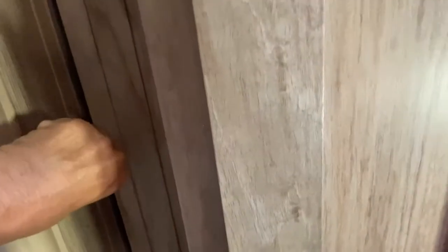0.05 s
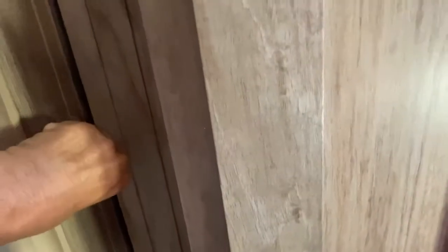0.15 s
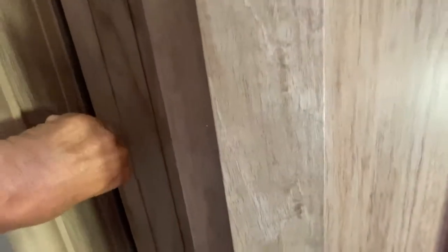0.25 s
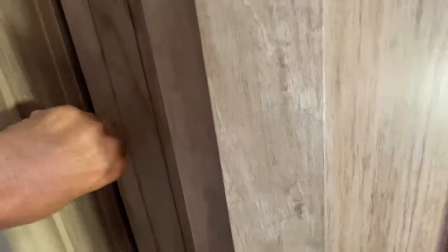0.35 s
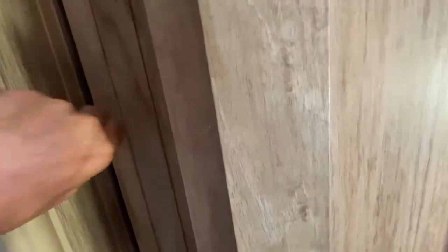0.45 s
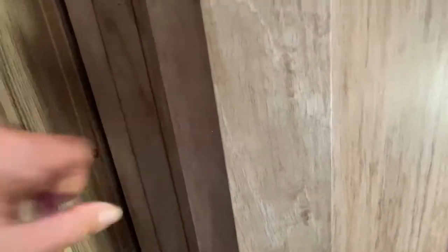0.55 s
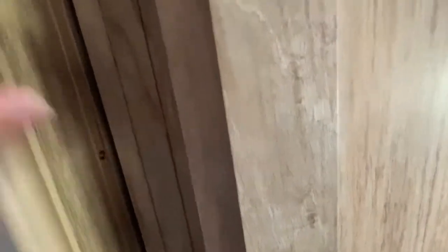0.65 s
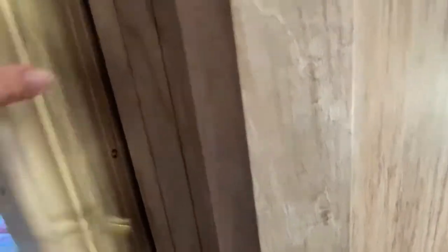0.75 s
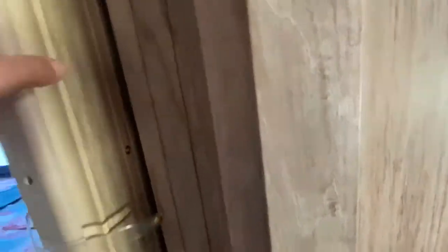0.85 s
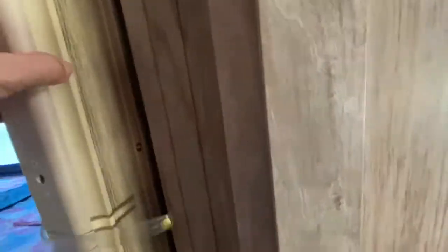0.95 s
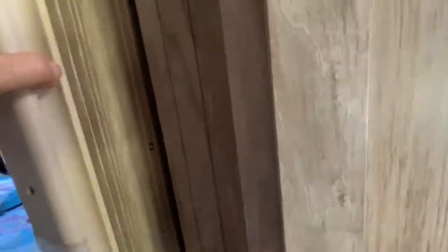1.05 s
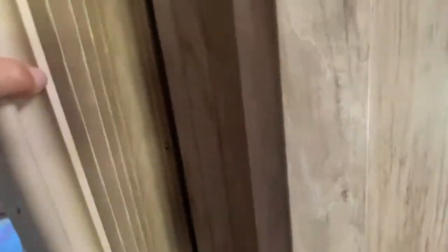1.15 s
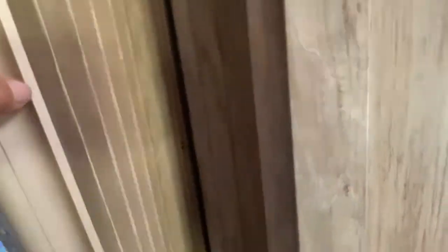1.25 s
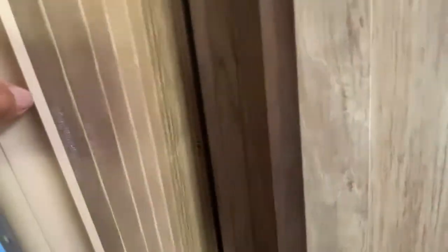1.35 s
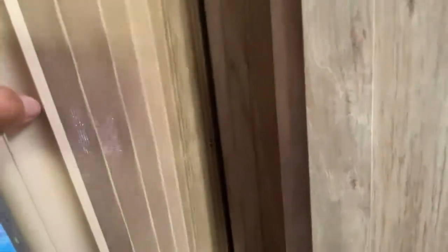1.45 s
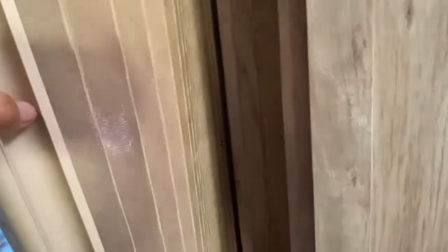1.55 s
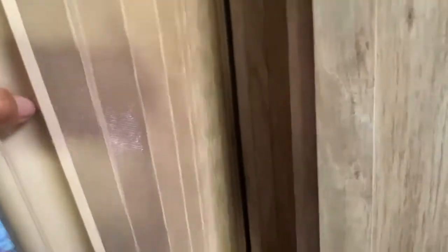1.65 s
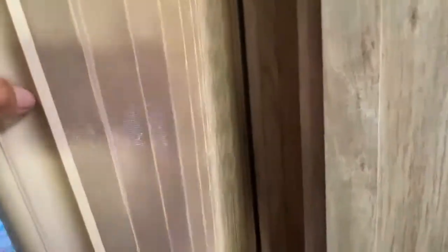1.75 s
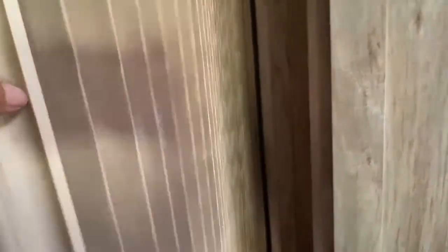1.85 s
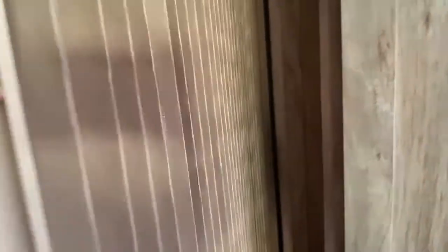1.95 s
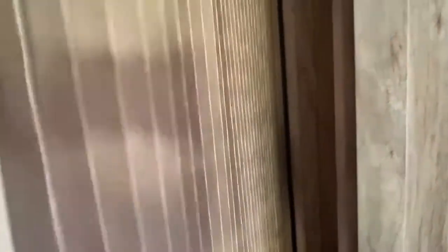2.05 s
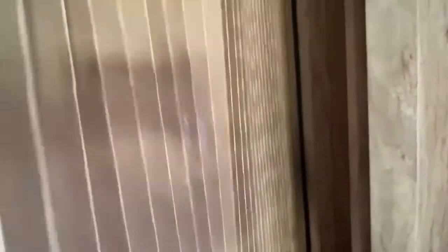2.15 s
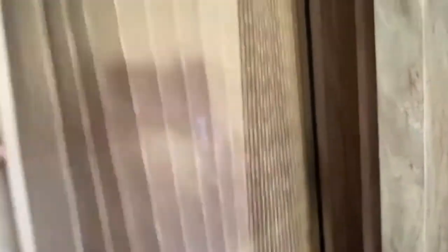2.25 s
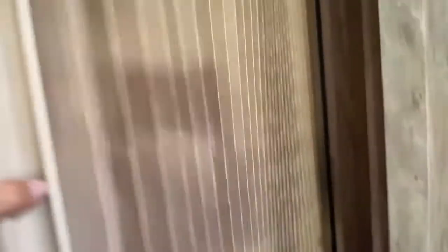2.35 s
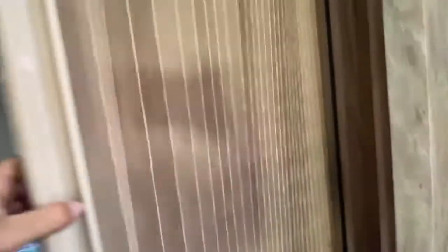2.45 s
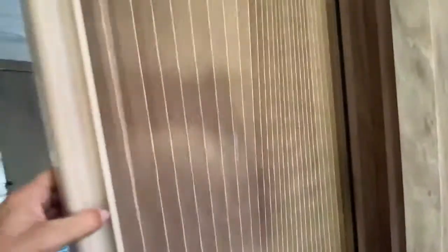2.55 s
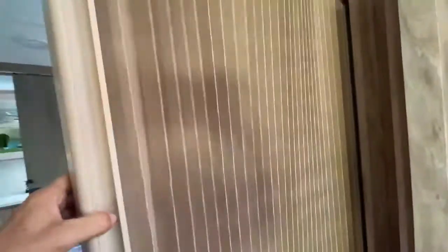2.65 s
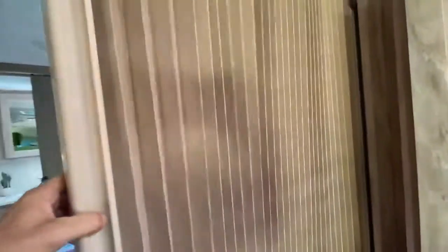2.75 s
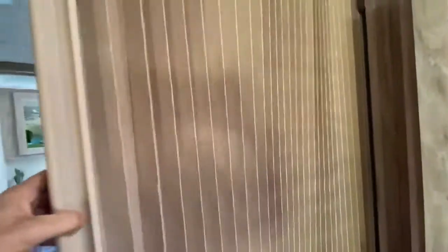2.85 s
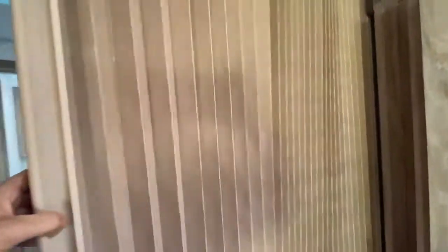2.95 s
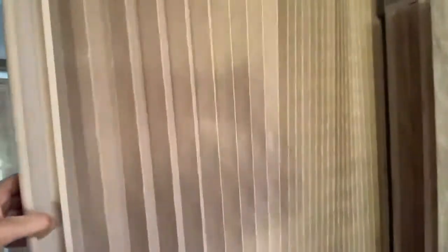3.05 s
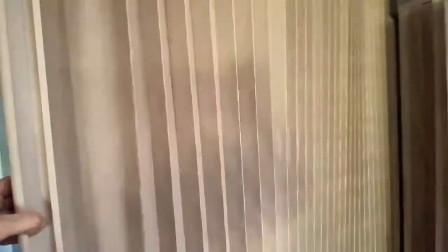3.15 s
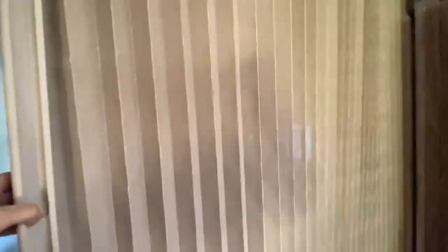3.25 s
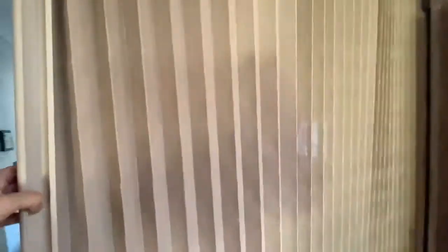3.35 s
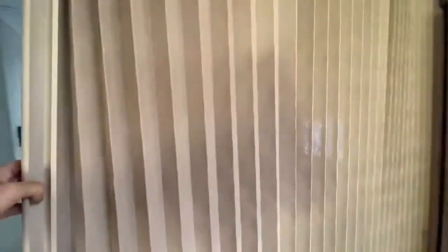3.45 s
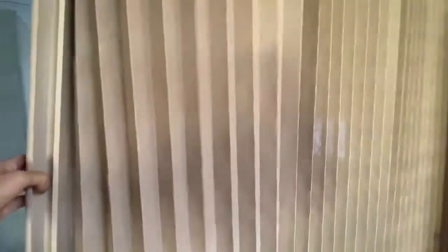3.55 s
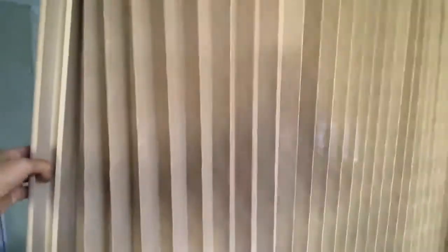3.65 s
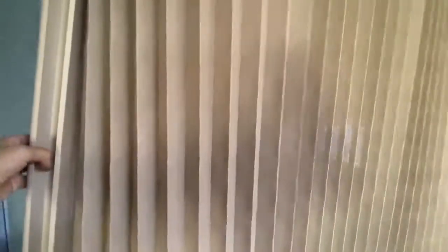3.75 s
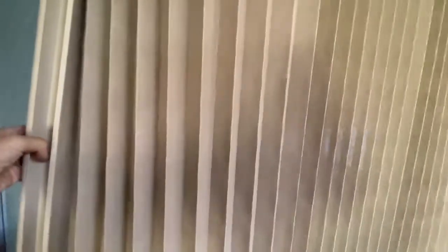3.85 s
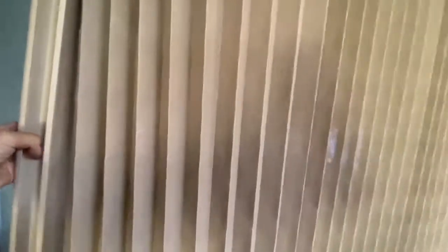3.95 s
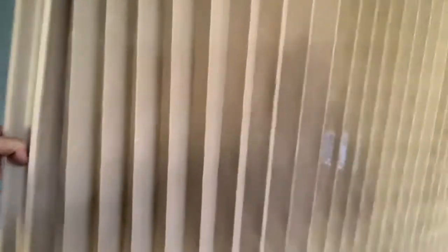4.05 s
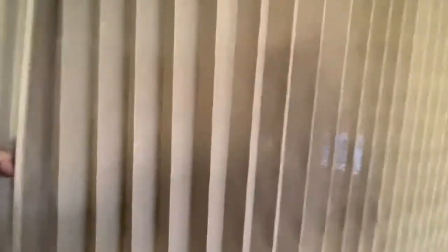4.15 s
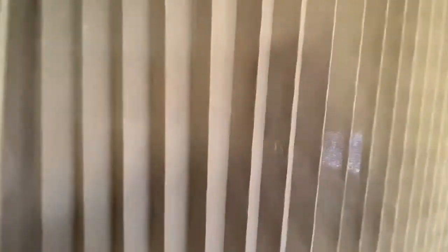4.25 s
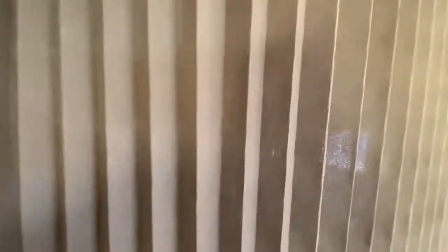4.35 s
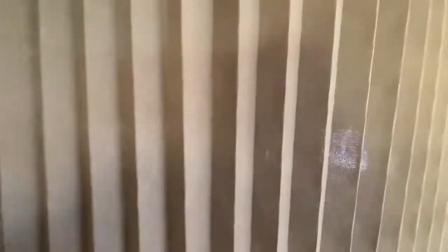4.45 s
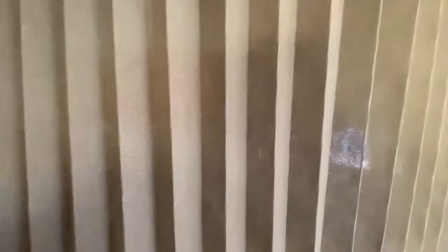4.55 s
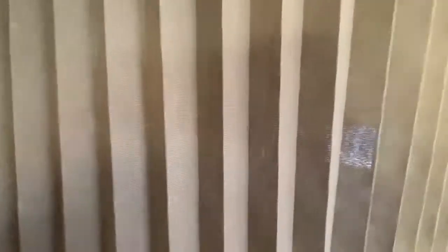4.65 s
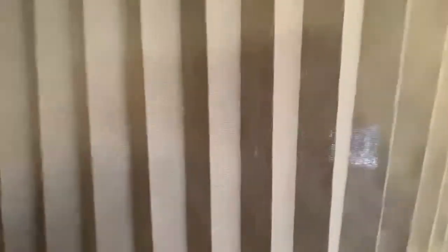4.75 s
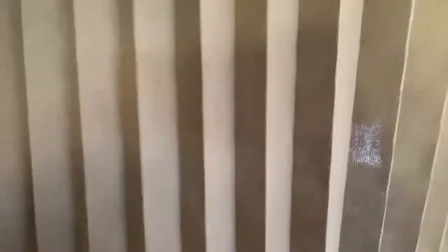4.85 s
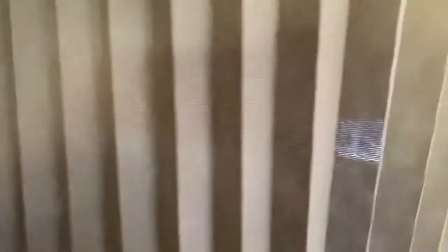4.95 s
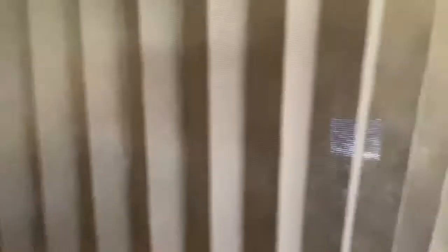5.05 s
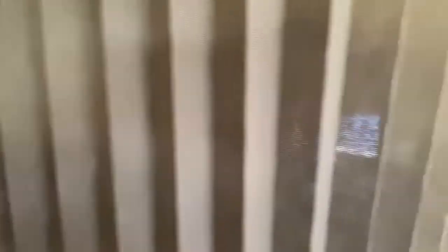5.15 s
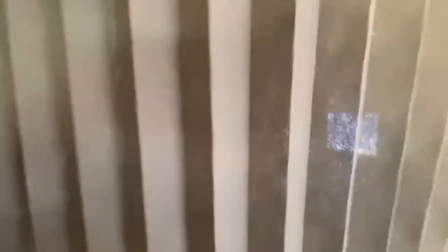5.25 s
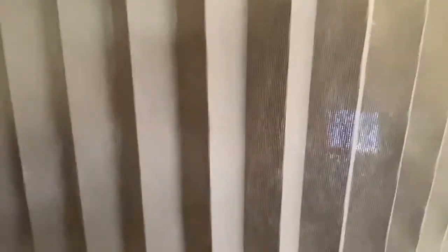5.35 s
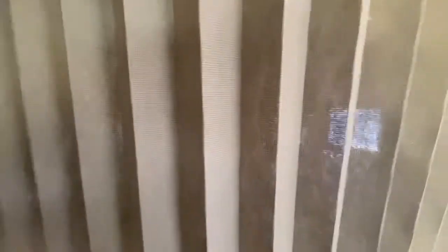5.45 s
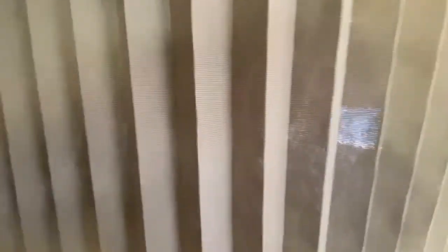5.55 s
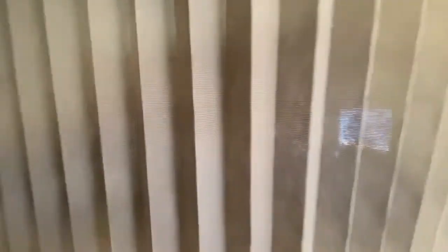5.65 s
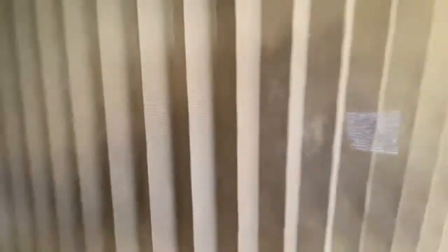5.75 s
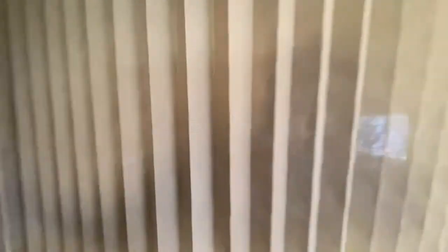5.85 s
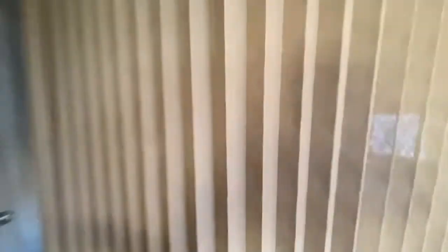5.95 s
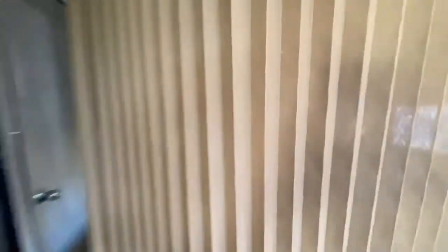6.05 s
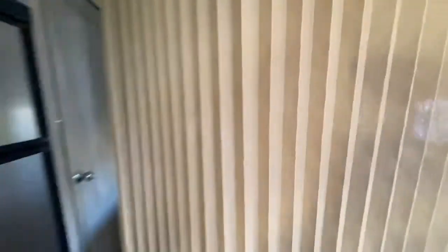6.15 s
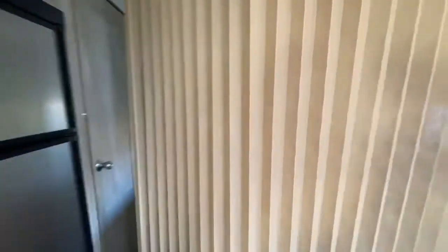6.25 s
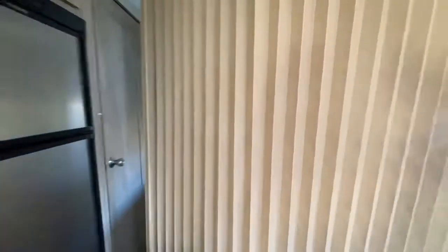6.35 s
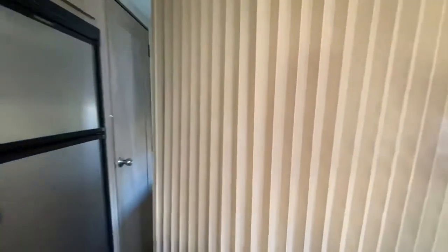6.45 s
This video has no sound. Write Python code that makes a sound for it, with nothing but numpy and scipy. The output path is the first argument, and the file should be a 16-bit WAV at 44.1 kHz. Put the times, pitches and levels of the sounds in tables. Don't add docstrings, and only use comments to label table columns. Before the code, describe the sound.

Close up in a small cabin, a folding door clunks loose, faint strap ticks follow, then it slides with clattering pleats and jerky clicking gliders.

```python
import sys
import numpy as np
from scipy import signal
from scipy.fft import rfft, irfft, next_fast_len
from scipy.io import wavfile
from scipy.ndimage import uniform_filter1d, map_coordinates

SR = 44100
rng = np.random.default_rng(int(sys.argv[2]) if len(sys.argv) > 2 else 0)


def boost_factor(decibels):
    exponent = np.asarray(decibels, float) / 20
    return 10 ** exponent


def persist_wave(psi):
    counts = np.round(np.clip(psi, -1, 1) * 32767).astype(np.int16)
    wavfile.write(sys.argv[1], SR, np.atleast_2d(counts).T)


N = 287091

# (frequency [Hz], density [dB per Hz])
HUSH_SPECTRUM = [(15, -15), (25, -9.5), (74, 8.5), (263, -24), (714, -7.5), (1130, -34), (1260, -25),
                 (6560, -37), (9320, -36), (16000, -53.5)]
HUSH_DB = -70
# (frequency [Hz], decay t60 [s])
CABIN_DECAY = [(100, 0.16), (1000, 0.14), (5000, 0.18), (12000, 0.015)]
# (time [s], peak level [dB], frequency [Hz])
GRIP_PUSH = (6.345, -44, 62)
# (middle [s], length [s], rms level [dB], centre [Hz], width [Hz])
BRUSH_STROKES = [(0.817, 0.046, -65, 11300, 7407), (.863, 0.057, -63, 11550, 7407),
                 (1.129, 0.097, -66.5, 10900, 6500), (1.379, 0.036, -38.5, 1304, 587),
                 (1.558, 0.14, -53.5, 3080, 1360), (1.745, 0.011, -40, 4500, 1080),
                 (4.061, 0.039, -60.5, 2560, 500), (4.071, 0.052, -62, 7700, 8800),
                 (4.295, 0.044, -56, 1140, 231.5), (5.799, 0.15, -61.5, 4880, 400),
                 (6.122, 0.034, -69.5, 8770, 6685), (6.16, 0.11, -51, 810, 300),
                 (6.171, 0.13, -53, 354, 110.6), (6.172, 0.11, -55.5, 606, 80),
                 (1.521, 0.13, -58, 3450, 700), (1.664, .07, -55.5, 2280, 905),
                 (5.757, 0.12, -55, 3760, 1500), (0.34, 0.031, -53.5, 700, 500),
                 (1.992, 0.0055, -45.5, 4600, 600), (1.997, 0.0082, -35, 4170, 700),
                 (2.746, 0.0082, -39.5, 4370, 3340), (3.08, .016, -34.5, 950, 900),
                 (3.204, 0.0087, -45, 1500, 1490), (2.533, .014, -41.5, 700, 700),
                 (1.428, 0.018, -35.5, 930, 350), (1.533, 0.067, -46, 1250, 600),
                 (1.605, 0.025, -37.5, 1060, 300), (1.668, 0.031, -36, 1080, 450),
                 (1.746, 0.026, -45.5, 1330, 200), (2.465, 0.022, -44.5, 536, 400),
                 (3.686, 0.019, -44, 265, 120), (4.602, 0.062, -58, 240, 120)]

# (frequency [Hz], width [Hz], level [dB])
RAIL_MODES = [(2500, 300, -29), (3040, 220, -25.5), (4500, 1500, -21), (5000, 400, -33), (6480, 210, -17.5)]
PANEL_MODES = [(601, 100, -10), (735.6, 36.6, -1), (799, 80, -2.5), (1136, 290, -4), (1224, 112, 0.5),
               (1409, 297, -7.5)]
PLEAT_MODES = [(189.7, 41.4, -2.5), (267, 75, 0), (351, 59, 2), (419.6, 163, -4.5)]
FRAME_MODES = [(45.8, 36, 1.5), (60.5, 17.7, 7), (90.7, 7.7, 4.5), (130.2, 39.4, -2.5)]
# (frequency [Hz], density [dB per Hz])
PLASTIC_SPECTRUM = [(710, -20.5), (1200, -13), (1880, -17), (2370, -13), (3440, -11.5), (4570, -13),
                    (5390, -15), (6710, -18), (7830, -29.5), (11100, -28.5), (13400, -44), (15400, -61),
                    (16500, -63)]
# (frequency [Hz], density [dB per Hz])
EDGE_SPECTRUM = [(4410, -16.5), (7500, -5.5), (8670, -5.5), (11100, -1.5), (13500, -18.5), (15100, -9.5),
                 (15900, -14.5), (16800, -12.5)]

# (time [s], peak level [dB], frequency [Hz], decay
# t60 [s])
SLAT_NOTES = [(.209, -14, 735, 0.076), (.209, -22, 362.5, 0.075), (.217, -15, 878, 0.038),
              (0.764, -54, 388, 0.11), (.852, -37.5, 335.6, 0.13), (.98, -55, 430, 0.11),
              (1.492, -27.5, 155, 0.084), (1.641, -28.5, 122, 0.18), (2.318, -50, 4600, 0.045),
              (2.343, -29, 6500, 0.039), (2.345, -46, 4370, .05), (2.386, -40, 2610, .04),
              (2.54, -29.5, 152, 0.099), (3.055, -43, 920, .1), (3.065, -40, 740, 0.11),
              (3.075, -46, 1230, .08), (3.085, -31, 340.5, 0.25), (3.186, -35, 343, 0.14),
              (3.255, -27.5, 342.6, 0.19), (3.326, -31.5, 6620, 0.044), (3.327, -37.5, 4890, 0.097),
              (3.414, -36, 4670, 0.028), (3.462, -45, 5000, 0.027), (3.589, -33.5, 3060, 0.042),
              (3.665, -46, 3040, 0.063), (3.665, -27.5, 4500, 0.065), (4.521, -31.5, 2523, 0.046),
              (4.922, -32, 5080, 0.046), (5.461, -43, 2465, .05), (5.641, -32.5, 2965, 0.024),
              (5.642, -41, 4290, 0.084), (5.682, -36.5, 2970, 0.052), (5.771, -36.5, 3940, 0.032),
              (5.807, -41.5, 3880, 0.046), (5.87, -41, 2440, 0.032),
              (.216, -26, 577, 0.12), (0.424, -35, 1180, .06), (.849, -38, 3380, 0.02),
                   (.425, -48, 274, .15), (.42, -41.5, 2240, 0.028), (.472, -46.5, 2120, 0.035),
                   (.766, -32.5, 1082, 0.06), (.775, -39.5, 342, 0.17), (.855, -42, 1210, 0.066),
                   (.86, -49.5, 2240, .05), (.975, -42, 886, 0.056), (1.128, -38, 1596, 0.041),
                   (1.13, -50, 795, .05), (1.192, -42, 1916, 0.035), (1.6, -44, 1220, 0.13),
                   (1.666, -31, 126, 0.1), (1.691, -27, 123, .1), (2.161, -38, 935, 0.067),
                   (2.222, -34, 1530, 0.028), (2.531, -35, 895, 0.15), (2.735, -35.5, 520, 0.09),
                   (4.342, -46, 810, 0.071), (4.487, -39, 706, 0.071), (4.523, -34.5, 1295, 0.095),
                   (4.811, -33, 91.5, 0.34), (4.925, -36, 1380, .08), (5.021, -29.5, 87.5, 0.22),
                   (5.08, -37, 87, 0.2), (5.29, -34.5, 873, 0.16), (5.31, -31, 376, 0.091),
                   (5.315, -30, 245, 0.17), (5.46, -40, 1385, 0.044), (5.701, -39.5, 944, 0.19),
                   (5.81, -42, 2610, 0.032), (4.34, -52, 2400, 0.06), (6.065, -44, 850, 0.11),
                   (4.277, -48, 292, 0.11), (6.2, -46, 860, 0.13), (3.215, -33, 568, 0.11),
                   (3.259, -36, 552, 0.093), (3.222, -38, 763, 0.11), (3.02, -44, 6540, 0.036)]
# (time [s], peak level [dB], frequency [Hz], length [s])
SNAP_BURST = [
    (1.9666, -12, 4500, .0017),
]
# (time [s], peak level [dB], ring [Hz])
FRAME_THUMPS = [(0.208, -21.5, 191), (0.226, -22.5, 75), (0.426, -38, 272), (0.763, -46.5, 360),
                (0.849, -40.5, 425), (0.979, -43, 415), (1.278, -32.5, 115), (1.483, -37, 95),
                (1.638, -31, 128), (1.67, -29, 89.7), (1.779, -40.5, 313), (2.001, -41.5, 127),
                (2.306, -40, 221), (2.517, -23.5, 96.8), (2.732, -39.5, 285), (3.032, -33.5, 253),
                (3.05, -23.5, 259), (3.071, -21, 114), (3.189, -34, 310), (3.218, -19.5, 329),
                (3.241, -30, 103), (3.461, -30.5, 128), (3.659, -37, 74.6), (4.031, -31, 87.4),
                (4.336, -43, 326), (4.396, -42.5, 97), (4.524, -39.5, 317), (4.851, -36.5, 240),
                (5.302, -32, 117.6), (5.81, -36.5, 85)]
# (time [s], peak level [dB], ring [Hz])
PANEL_KNOCKS = [(0.209, -37.5, 640), (0.217, -31.5, 462), (0.421, -49, 870), (0.764, -49, 465),
                (0.85, -47.5, 446), (0.961, -58, 560), (1.129, -45.5, 1140), (1.238, -47, 790),
                (1.295, -46, 780), (1.414, -36, 932), (1.49, -46.5, 1300), (1.597, -39.5, 1035),
                (1.638, -42, 932), (1.678, -38.5, 1010), (3.062, -33.5, 817), (4.025, -47.5, 660),
                (4.339, -52, 800), (4.488, -45.5, 1216), (5.315, -42, 804), (6.465, -62, 710)]

# (time [s], load on the frame [dB], drag in the rail [dB])
STEADY_PULL = [(0, -50, -98), (.1, -88, -98), (.2, -61, -78), (0.398, -54, -73.5), (.72, -69.5, -82),
               (.8, -61, -69), (1.85, -56, -59.5), (2.05, -48, -57.5), (3.75, -45, -56), (3.97, -53.5, -67),
               (4.22, -66.5, -66.5), (4.4, -49.5, -58), (4.74, -59, -64), (5.2, -50, -57.5),
               (5.625, -62.5, -70), (5.92, -59.5, -54.5), (6.02, -60.5, -84.5), (6.51, -80, -84)]
DRONE_DB, SCRAPE_DB = -8, 2
# (middle [s], length [s], frame level [dB], pleats against frame [dB])
DOOR_SWAYS = [(.3, 0.051, -41, -20), (.5, 0.11, -50.5, -6), (.8, 0.018, -78, 20.5), (1.03, 0.049, -62, 8.5),
              (1.33, 0.11, -46, -4), (1.68, 0.12, -48, -9), (2.55, 0.069, -41.5, -17),
              (3.2, 0.12, -35, -11.5), (3.6, 0.13, -46, -10), (4.12, 0.11, -58, -8), (4.86, 0.1, -49, -0.5),
              (5.06, 0.085, -45, -9), (5.35, 0.057, -42, -6), (5.7, 0.2, -67.5, 12.5), (6.17, 0.2, -73, 4)]
# (middle [s], length [s], panel level [dB], rail against panel [dB])
RUNNER_DRAGS = [(0, 0.013, -65, -29), (.5, 0.062, -57.5, -19), (.82, 0.066, -57.5, -10),
                (1.35, 0.094, -48, -9.5), (1.66, 0.097, -45.5, -21), (2.13, 0.041, -58, -0.5),
                (2.48, 0.039, -52, -2), (2.7, 0.043, -69, -32), (3.28, 0.039, -57, -4),
                (3.62, 0.049, -62.5, 13), (4.09, 0.022, -65.5, 2), (4.9, 0.11, -55, -4.5),
                (5.53, 0.052, -68.5, 16), (5.7, 0.16, -57.5, -22), (6.16, 0.092, -56, -6)]

# (time [s], peak level [dB], ring [Hz], decay t60 [s])
RAIL_RATTLES = [(.8473, -40.5, 2150, 0.06), (1.0758, -49, 2300, 0.53), (1.3584, -25.5, 3360, 0.084),
                (1.7275, -29, 4170, 0.1), (1.8648, -35, 4500, 0.11), (1.8962, -36.5, 4340, 0.13),
                (1.995, -24, 4130, 0.022), (2.2, -31, 2950, 0.071), (2.449, -25.5, 3920, 0.028),
                (2.6337, -31, 4420, 0.063), (2.7328, -25, 2700, 0.071), (2.8473, -34, 2660, 0.077),
                (3.0601, -22.5, 4800, 0.14), (3.199, -21, 5030, 0.062), (3.2603, -34.5, 5000, 0.091),
                (3.4148, -36, 4730, 0.26), (3.4607, -26, 5000, 0.032), (3.5865, -26.5, 4960, 0.069),
                (3.756, -32.5, 3100, 0.045), (3.8282, -41.5, 5230, 0.12), (4.5213, -37, 2620, 0.039),
                (4.6884, -38.5, 4760, 0.076), (4.807, -30.5, 4940, 0.066), (4.8878, -27.5, 2680, 0.025),
                (5.1718, -39, 4500, 0.06), (5.2854, -26.5, 3000, 0.12), (5.313, -28.5, 3130, 0.1),
                (5.639, -38.5, 4600, 0.16), (2.221, -37, 2500, 0.043), (2.426, -35.5, 4790, 0.057),
                (2.583, -37, 2930, 0.031), (2.815, -39, 4100, 0.039), (2.992, -34.5, 2920, 0.032),
                (3.172, -50, 4060, 0.023), (3.528, -49, 5720, .05), (3.58, -31, 4600, 0.03),
                (3.652, -36, 4700, .03), (3.776, -34.5, 4960, 0.055), (4.368, -42, 2700, 0.037),
                (4.529, -34.5, 2500, 0.03), (4.857, -37, 4550, .05), (5.376, -38, 2140, 0.071),
                (5.77, -42, 4860, 0.045)]
HOLLOW_JOLTS = [(.2074, -22.5, 1820, 0.076), (.2439, -28.5, 2070, 0.028), (.4195, -45, 2300, 0.051),
                (.7633, -38.5, 3420, 0.03), (1.1286, -41, 4300, 0.14), (1.2339, -39.5, 2060, 0.052),
                (1.2942, -31.5, 2380, 0.065), (1.335, -35, 2300, 0.3), (1.5974, -35, 3200, 0.071),
                (2.0329, -39, 4540, 0.35), (2.2629, -35, 4870, 0.042), (2.5201, -29.5, 3040, 0.073),
                (2.5283, -27.5, 3040, 0.086), (3.0524, -21.5, 3130, 0.055), (3.0774, -32, 2000, 0.22),
                (4.3406, -41, 2400, 0.098), (4.4863, -39.5, 4070, 0.15), (5.6835, -40.5, 3000, 0.12),
                (5.7255, -43.5, 4700, 0.14), (5.8682, -39, 2500, 0.07)]
DRY_TICKS = [(1.9625, -19.5, 4260, 0.05), (1.9695, -29, 4400, 0.077), (2.0695, -19.5, 5100, 0.076),
             (2.3150, -31, 2130, 0.13), (2.342, -25, 4640, 0.09), (2.3846, -27.5, 5330, 0.053),
             (3.0127, -27, 5730, 0.071), (3.325, -24.5, 5350, 0.086), (3.6612, -18.5, 5000, 0.093),
             (4.9199, -20.5, 5150, 0.092), (5.2441, -30, 2550, 0.029), (5.4595, -23, 2600, 0.047)]
STRAP_TAPS = [(.472, -47, 2340, 0.039), (.5512, -57, 2730, 0.019), (.5778, -72, 2160, 0.044),
              (.591, -43, 5470, 0.02), (.6005, -61, 5230, 0.18), (.6409, -83, 5790, 0.014),
              (.6784, -38, 2200, 0.012), (.7217, -51, 2270, 0.011), (1.3435, -52, 6000, .05),
              (1.486, -72, 7000, 0.24), (1.6765, -50, 6500, 0.12), (1.781, -64, 6000, 0.15),
              (1.8, -59, 6000, 0.039)]
RATTLE_DB, JOLT_DB, TICK_DB, STRAP_DB = 0, 4.5, -37, -3.5
# (time [s], peak level [dB])
EDGE_CRACKS = [(.2074, -24.5), (.472, -50), (.5512, -49), (.5778, -44), (.591, -36), (.6005, -34),
               (.6409, -43), (.6784, -44), (.7217, -51), (.7633, -41.5), (.8473, -37.5), (1.0758, -40.5),
               (1.1286, -40), (1.2942, -39), (1.3435, -44), (1.486, -37.5), (1.6765, -53), (1.781, -40),
               (1.8, -44), (2.0695, -28.5), (2.5201, -40.5), (2.5283, -18.5), (3.0524, -27), (3.0601, -15),
               (3.0774, -26.5), (3.199, -31), (3.325, -23), (3.6612, -27.5), (4.9199, -25), (5.2854, -40),
               (5.313, -26)]
EDGE_DB = -36

# (frequency [Hz], lead of the left [rad])
PORT_LEAD = [(250, 0), (620, 2.0), (1300, 2.4), (2300, 6.3), (6600, 17.6), (8500, 25.2), (10100, 19.5),
             (11700, 18.3), (15500, 12.8)]
# (frequency [Hz], drift [rad])
LEAD_DRIFT = [(1100, .4), (1500, 1.2), (3700, 1.5), (4300, .9), (5200, 1.3), (8600, 1.5), (9700, .9),
              (10400, .17)]
# (frequency [Hz], left minus right [dB])
PORT_TILT = [(150, -3), (370, -8), (700, 2), (1300, 1), (2000, -4), (3000, 1), (8000, 3.5), (10000, -.3)]
# (frequency [Hz], likeness [0..1])
PORT_LIKENESS = [(60, .93), (900, .96), (2500, .75), (10000, .99)]
# (frequency [Hz], level [dB])
MIC_BAND = [(24, -10.5), (42, -2.5), (15700, -2), (15850, -15.5), (16500, -20), (16700, -41)]


def unit(x):
    return x / np.sqrt(np.mean(x ** 2, axis=-1, keepdims=True) + 1e-20)


def peaked(x):
    return x / np.abs(x).max(axis=1, keepdims=True)


def even(x, t60):
    energy = np.sum(x ** 2, axis=1) / (t60 * SR / 100)
    return x / np.sqrt(energy)[:, None]


def along(points, hz):
    f, v = np.transpose(points)
    return np.interp(np.log(hz + 1), np.log(f + 1), v)


def modes(table, f):
    total = 0
    for k, (centre, width, db) in enumerate(table):
        resonance = 1j * f * width / (centre * centre - f * f + 1j * f * width)
        total = total + (-1) ** k * boost_factor(db) * resonance
    return total


def filtered(x, response):
    n = x.shape[-1]
    m = next_fast_len(n + SR // 8)
    return irfft(rfft(x, m) * response(np.fft.rfftfreq(m, 1 / SR)), m)[..., :n]


def wobble(rate):
    knots = rng.standard_normal(int(N * rate / SR) + 4)
    return map_coordinates(knots, [np.arange(N) * rate / SR])


def swells(rows):
    t = np.arange(N) / SR
    total = 0
    for middle, length, db, other_db in rows:
        total = total + boost_factor([[db], [db + other_db]]) * np.exp(-((t - middle) / length) ** 2)
    return total


def gritty(shape, spike_db):
    return unit(rng.standard_normal(shape) * boost_factor(spike_db * rng.exponential(size=shape)))


def chatter(t60, rise, spike_db):
    t = np.arange(SR // 5) / SR
    fade = boost_factor(-60 * t / np.clip(t60, .01, .4)[:, None]) * (1 - np.exp(-t / rise))
    return fade * gritty(fade.shape, spike_db)


def lay(times, bursts):
    where = np.round(times * SR).astype(int)[:, None] + np.arange(bursts.shape[1])
    return np.bincount(where.ravel(), bursts.ravel(), N + SR)[:N]


def hush():
    return unit(filtered(rng.standard_normal((2, N)), lambda f: boost_factor(along(HUSH_SPECTRUM, f))))


def cabin(x):
    hop, out = SR // 4, np.zeros((2, N + 2 * SR))
    padded = np.pad(x, (hop, 2 * hop))
    for start in range(-hop, N, hop):
        hz, t, z = signal.stft(rng.standard_normal((2, hop)), SR, nperseg=256)
        decay = boost_factor(-60 * t / along(CABIN_DECAY, hz)[:, None])
        tail = signal.istft(z * decay, SR, nperseg=256)[1]
        piece = padded[start + hop:][:2 * hop] * np.hanning(2 * hop)
        echo = signal.fftconvolve(piece[None], tail / np.linalg.norm(tail[0]), axes=1)
        out[:, start + hop:][:, :echo.shape[1]] += echo
    return out[:, hop - 120:][:, :N]


def grip():
    s, db, hz = GRIP_PUSH
    t = np.arange(N) / SR - s
    return boost_factor(db) * np.exp(-(t * hz) ** 2) * np.cos(2 * np.pi * hz * t + 1)


def brushes():
    s, length, db, hz, width = np.transpose(BRUSH_STROKES)[:, :, None]
    t = np.arange(SR // 2) / SR - 1 / 4
    grain = gritty((len(s), len(t)), spike_db=-3.0)
    fizz = unit(filtered(grain, lambda f: modes([(hz, width, 0)], f) ** 2))
    return lay(s[:, 0] - 1 / 4, boost_factor(db) * np.exp(-(t / length) ** 2) * fizz)


def notes():
    s, db, hz, t60 = np.transpose(SLAT_NOTES)[:, :, None]
    t = np.arange(SR // 4) / SR
    fade = boost_factor(db - 60 * t / np.clip(t60, .01, .3))
    onset = 1 - np.exp(-t * hz / 2)
    return lay(s[:, 0], fade * onset * np.sin(2 * np.pi * hz * t))


def snap():
    s, db, hz, length = np.transpose(SNAP_BURST)[:, :, None]
    t = np.arange(SR // 100) / SR
    envelope = np.exp(-4 * (t / length - .7) ** 2)
    return lay(s[:, 0], boost_factor(db) * np.sin(2 * np.pi * hz * t) * envelope)


def thumps():
    s, db, hz = np.transpose(FRAME_THUMPS)[:, :, None]
    t = np.arange(SR // 5) / SR
    t60 = 0.066 + 4 / hz
    onset = 1 - np.exp(-(t * hz) ** 2)
    swing = -np.sin(2 * np.pi * hz * t) * boost_factor(-60 * t / t60) * onset
    bounce = chatter(1.01 * t60[:, 0], rise=0.0036, spike_db=1.0)
    shake = filtered(bounce, lambda f: modes(PLEAT_MODES, f) + modes(FRAME_MODES, f))
    return lay(s[:, 0], boost_factor(db) * (0.95 * peaked(swing) + 0.74 * peaked(shake)))


def knocks():
    s, db, hz = np.transpose(PANEL_KNOCKS)
    blow = peaked(chatter(0.058 + 0 * s, rise=0.0003, spike_db=0.5))
    blow[:, 0] = 4

    def body(f):
        panel = modes(PANEL_MODES, f) / (1 + 1j * f / 3500)
        return modes([(hz[:, None], 220, 0)], f) ** 2 + 0.34 * panel

    return lay(s, boost_factor(db + 14.0)[:, None] * peaked(filtered(blow, body)))


def slide():
    s, *rows = np.transpose(STEADY_PULL)
    load, drag = [boost_factor(np.interp(np.arange(N) / SR, s, r)) for r in rows]
    frame, pleats = swells(DOOR_SWAYS) + load * boost_factor([[0], [DRONE_DB]])
    panel, runner = swells(RUNNER_DRAGS) + drag * boost_factor([[SCRAPE_DB], [0]])
    jerk = wobble(21.963)

    def rail(f):
        return boost_factor(along(PLASTIC_SPECTRUM, f)) * (1 + .4 * modes(RAIL_MODES, f))

    hiss = filtered(gritty(N, spike_db=2.5), rail)
    hiss = unit(boost_factor(1.5 * jerk + 2.2 * wobble(90)) * hiss)
    scrape = filtered(gritty(N, spike_db=1.5), lambda f: modes(PANEL_MODES, f))
    scrape = unit(boost_factor(1.5 * jerk + 1.4 * wobble(50)) * scrape)
    drone = filtered(rng.standard_normal(N), lambda f: modes(PLEAT_MODES, f))
    drone = unit(boost_factor(jerk + 2.2 * wobble(25)) * drone)
    rumble = filtered(rng.standard_normal(N), lambda f: modes(FRAME_MODES, f))
    rumble = unit(boost_factor(2.03 * wobble(15)) * rumble)
    return runner * hiss + panel * scrape + pleats * drone + frame * rumble


def rattles():
    kinds = [(RAIL_RATTLES, RATTLE_DB), (HOLLOW_JOLTS, JOLT_DB), (DRY_TICKS, TICK_DB), (STRAP_TAPS, STRAP_DB)]
    contacts = [(*row, share_db) for rows, share_db in kinds for row in rows]
    s, db, hz, t60, panel_db = np.transpose(contacts)
    edge_db = db + EDGE_DB
    for when, crack_db in EDGE_CRACKS:
        edge_db[np.abs(s - when).argmin()] = crack_db

    def glider(f):
        ring = modes([(hz[:, None], .15 * hz[:, None], -4)], f)
        return ring + 0.35 * modes(RAIL_MODES, f) + 1.73 * boost_factor(along(PLASTIC_SPECTRUM, f))

    shake = chatter(t60, rise=.0009, spike_db=3.5)
    own = even(filtered(shake, glider), t60)
    panel = even(filtered(shake, lambda f: modes(PANEL_MODES, f)), t60)
    click = chatter(0.25 * t60, rise=0.0003, spike_db=5)
    edge = peaked(filtered(click, lambda f: boost_factor(along(EDGE_SPECTRUM, f))))
    mix = own + boost_factor(panel_db)[:, None] * panel
    return lay(s, boost_factor(db)[:, None] * mix + boost_factor(edge_db)[:, None] * edge)


def scene():
    door = brushes() + notes() + snap() + thumps() + knocks() + slide() + rattles()
    shared, apart = cabin(door)

    def difference(f):
        return np.tan(np.arccos(np.clip(along(PORT_LIKENESS, f), 0, 1)) / 2)

    near = door + boost_factor(-16.5) * shared
    wide = filtered(apart, difference) + grip()
    common, separate = hush()
    air = np.array([common + separate, common + separate])
    return np.array([near + wide, near - wide]) + boost_factor(HUSH_DB) * air


def drifting_lead(dry, side):
    hz, _, z = signal.stft(dry, SR, nperseg=256)
    field = rng.standard_normal(z.shape[1:])
    field = uniform_filter1d(uniform_filter1d(field, size=4, axis=0), size=14, axis=1)
    drift = along(LEAD_DRIFT, hz)[:, None] * field / field.std()
    return signal.istft(z * np.exp(1j * side[:, None] * drift), SR, nperseg=256)[1][:, :N]


def low_pass(x):
    return signal.sosfilt(signal.butter(12, 16960, fs=SR, output="sos"), x)


def record(dry):
    side = np.array([[.5], [-.5]])

    def port(f):
        colour = boost_factor(side * along(PORT_TILT, f) + along(MIC_BAND, f))
        return colour * np.exp(1j * side * np.interp(f, *np.transpose(PORT_LEAD)))

    mix = filtered(drifting_lead(dry, side), port)
    return low_pass(mix)


dry = scene()
out = record(dry)
persist_wave(out)
```